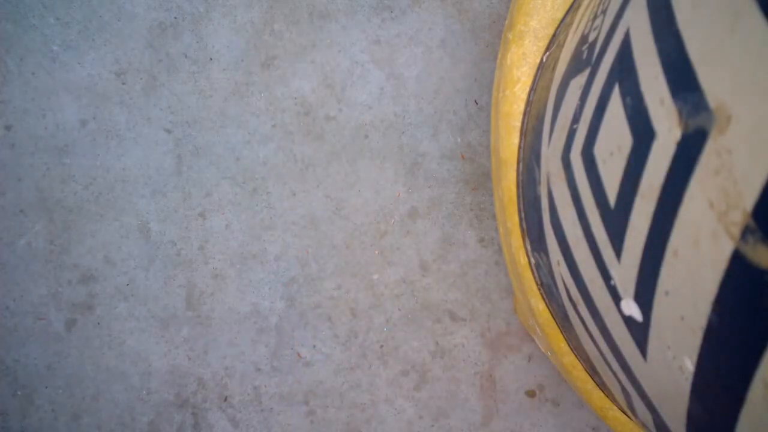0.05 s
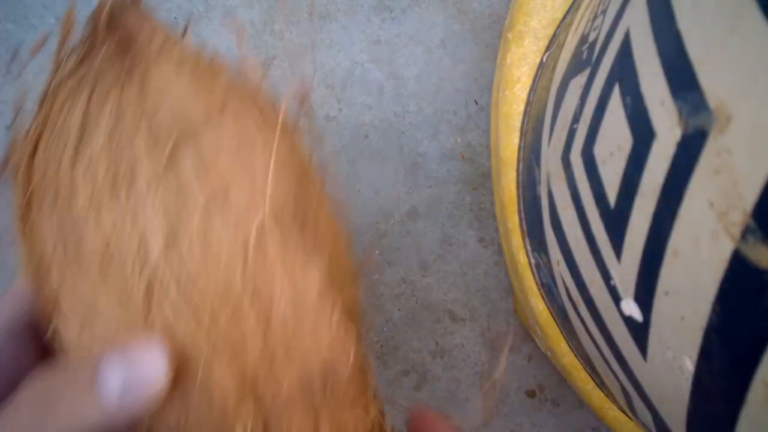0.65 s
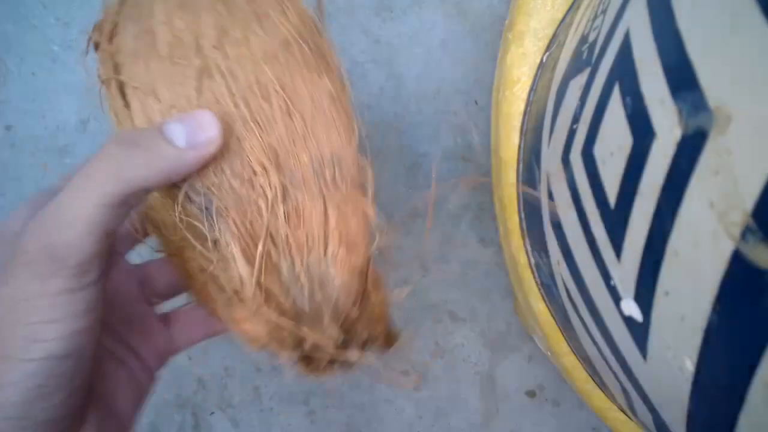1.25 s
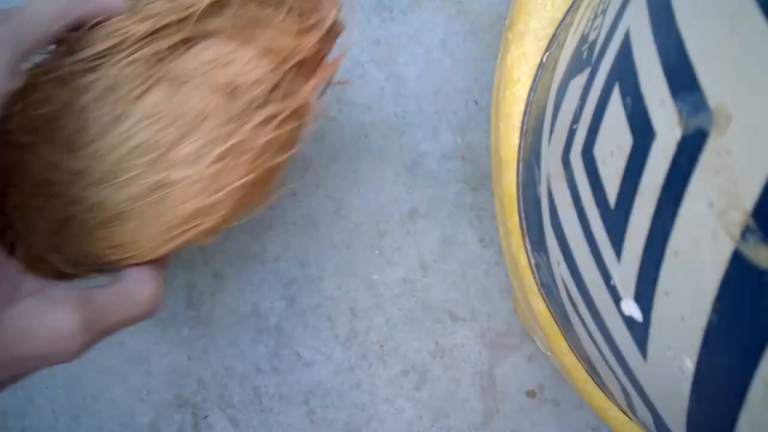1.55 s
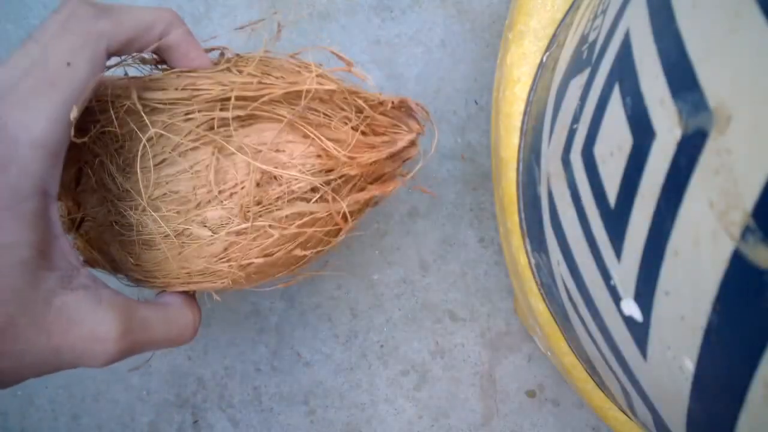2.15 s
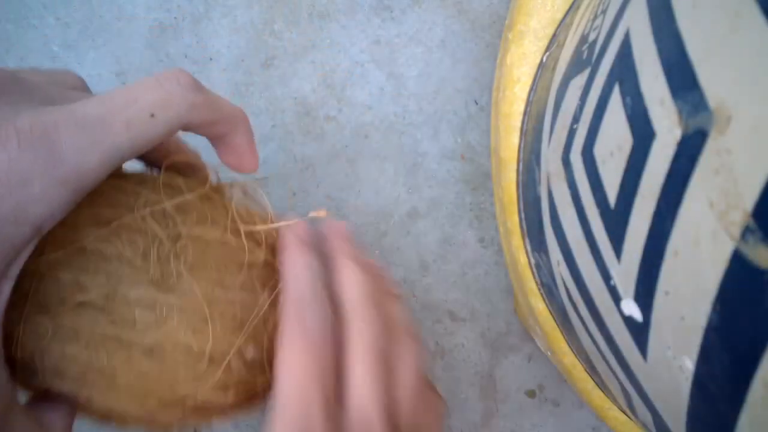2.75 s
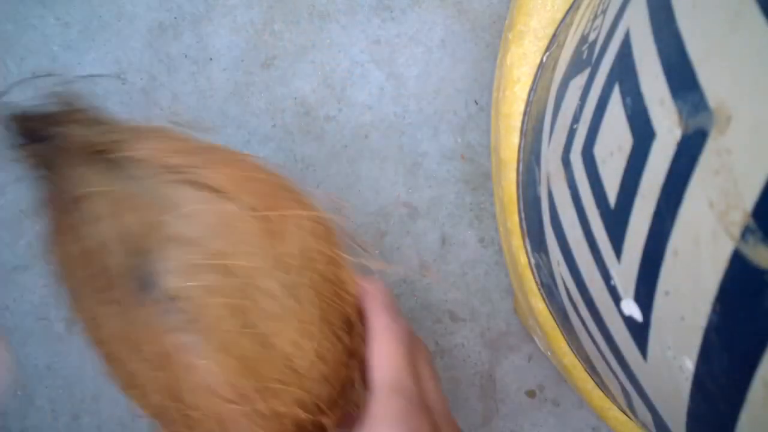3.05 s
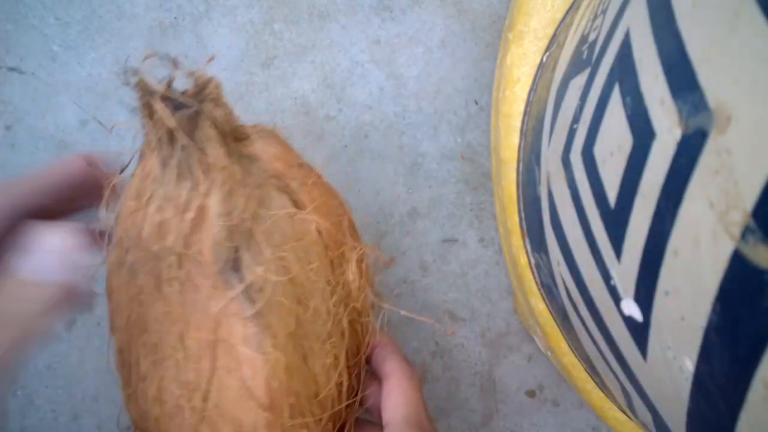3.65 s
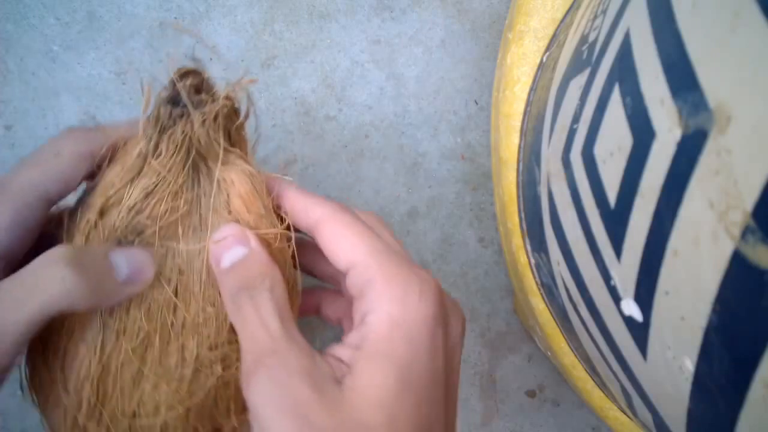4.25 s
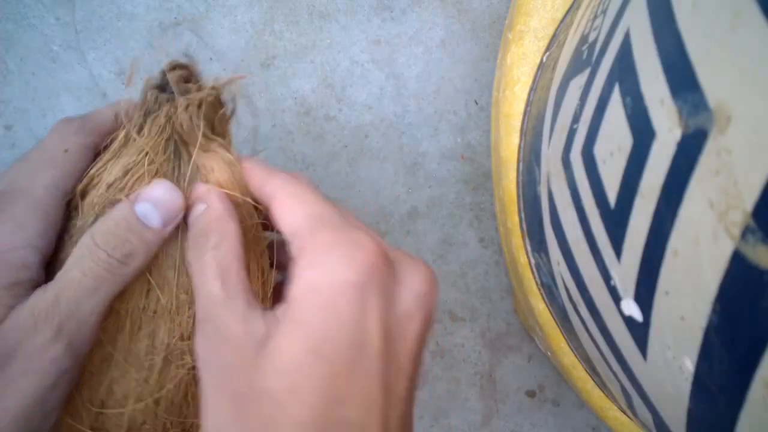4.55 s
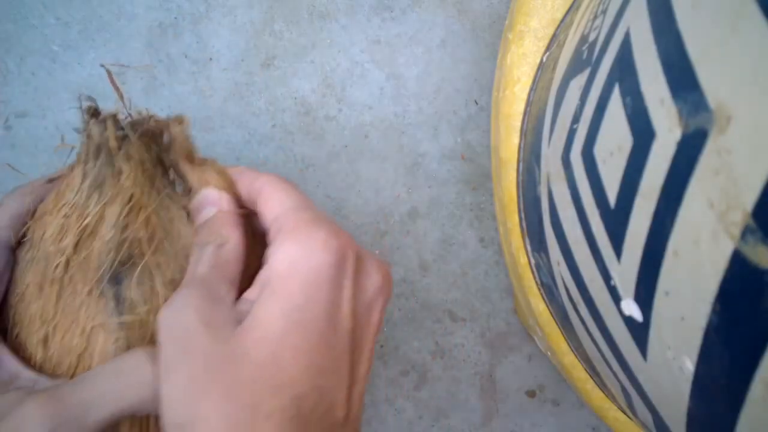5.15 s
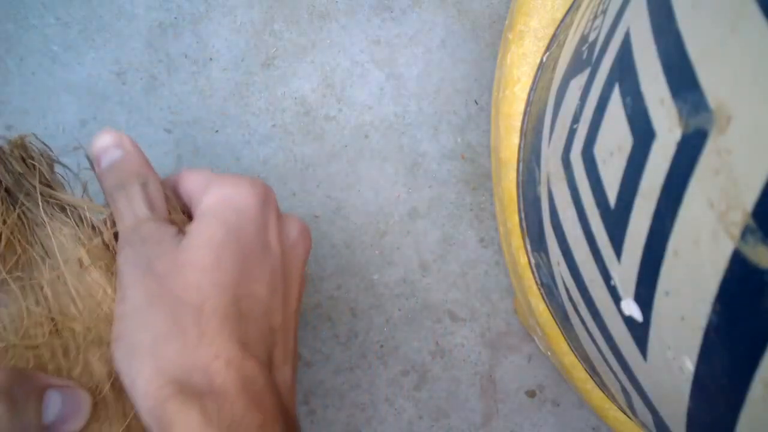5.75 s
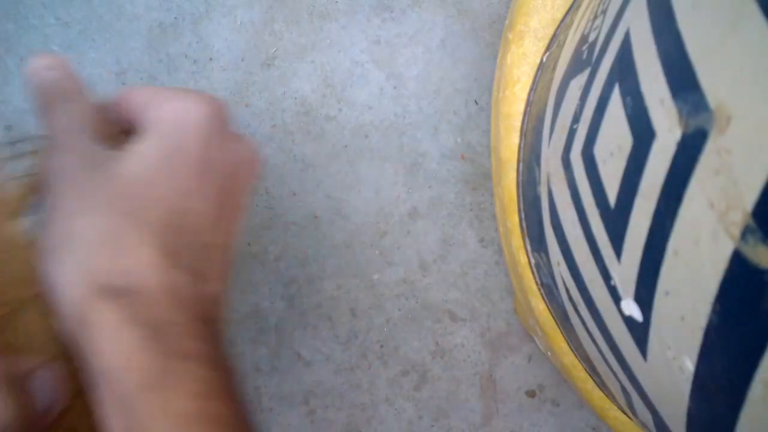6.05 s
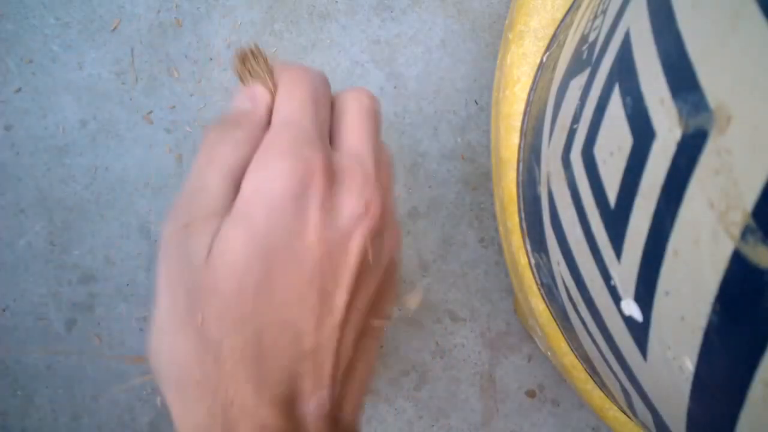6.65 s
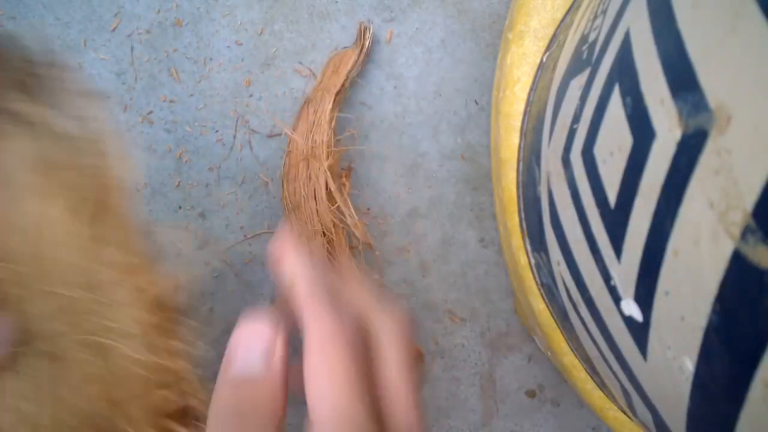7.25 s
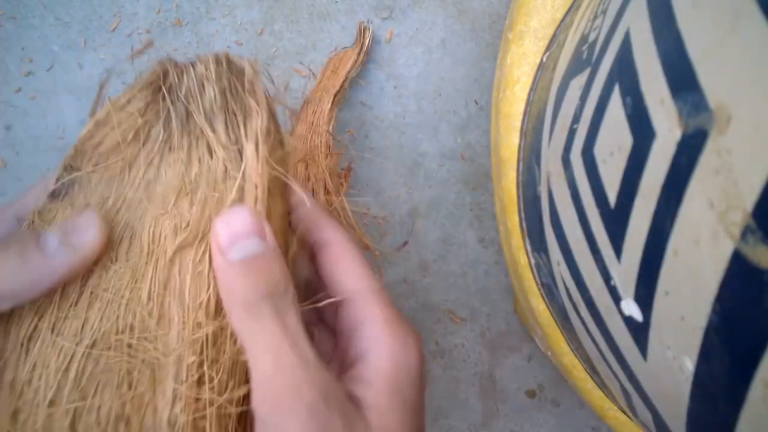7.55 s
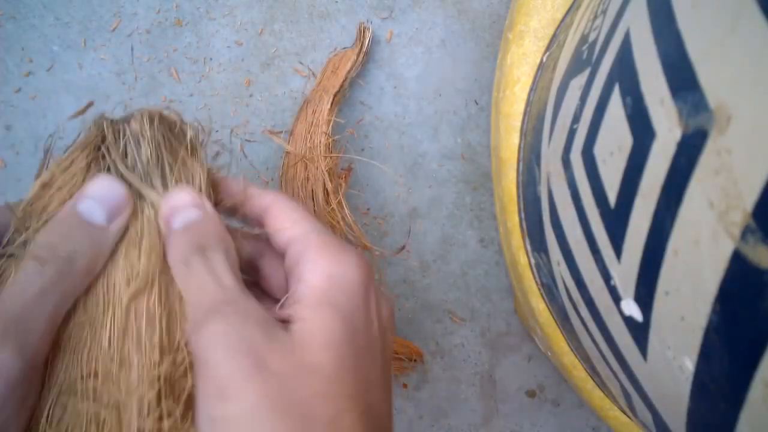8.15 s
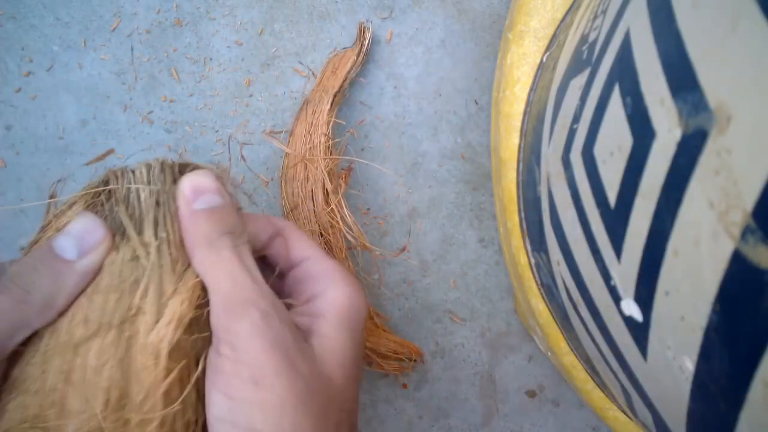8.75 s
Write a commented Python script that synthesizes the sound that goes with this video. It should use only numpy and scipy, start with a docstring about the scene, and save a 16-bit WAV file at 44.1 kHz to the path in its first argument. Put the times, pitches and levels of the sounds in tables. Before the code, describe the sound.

Hands rub and scratch a dry coconut husk, then rip a strip away in two loud crackling pulls, with faint birds far off.

```python
"""A dry coconut husk is rubbed, prised open and torn in two pulls over a stone floor.
Friction and fracture release thousands of stiff fibres, each a tiny crack with a damped ring.
The hollow nut resonates under the fingers, small hard things tick, arms rustle, the husk creaks
and the freed strip scrapes the floor. Hard walls reflect a short tail;
small birds whistle far away over a faint hush of air."""
import sys
import numpy as np
from scipy import signal
from scipy.fft import rfft, irfft
from scipy.io import wavfile
from scipy.ndimage import uniform_filter1d, map_coordinates

SR = 44100
rng = np.random.default_rng(int(sys.argv[2]) if len(sys.argv) > 2 else 0)


def unload_wav(signal):
    """Save mono or channel-first audio to the path in sys.argv[1] as 16-bit WAV at rate SR, clipped to [-1, 1]."""
    wavfile.write(
        sys.argv[1],
        SR,
        np.round(np.clip(np.atleast_2d(signal).T, -1, 1) * 32767).astype(np.int16),
    )


N = 388080
TIME, BIN_HZ = np.arange(N) / SR, np.fft.rfftfreq(N, 1 / SR)
CRACKLE_HZ, BODY_HZ, DEEP_HZ = (5000, 9000), (500, 1800), (120, 450)  # bands in which levels are set
SAG_DB_PER_S, RELEASE_DB_PER_S = 17, 178

# finger strokes: (start [s], length [s], relative scratch level [dB], body offset [dB])
STROKES = [(0.0, 0.0067, -57, -1.5), (0.1, 0.44, -62, -3.5), (0.44, 0.19, -70, 10.5),
           (0.675, 0.043, -65.5, 4.5), (1.305, 0.025, -57, -24), (1.7, 0.13, -59, -7),
           (1.893, 0.05, -52, -4), (1.968, 0.062, -54.5, -1.5), (2.55, 0.3, -67.5, -5),
           (2.675, 0.15, -58.5, -1), (2.885, 0.092, -61.5, 5.5), (2.94, 0.19, -52.5, -5.5),
           (3.855, 0.097, -51.5, -6), (4.115, 0.064, -50.5, -10), (4.2, 0.11, -60, -1.5),
           (4.355, 0.023, -55, 2), (4.43, 0.14, -53, 0), (4.61, 0.24, -53.5, -3), (4.82, 0.11, -48, -7.5),
           (4.92, 0.12, -52.5, -5.5), (5.125, 0.055, -60.5, 4), (5.56, 0.083, -45.5, -12),
           (5.715, 0.083, -44.5, -12), (5.8, 0.26, -57, -13), (6.02, 0.055, -45.5, -12),
           (6.76, 0.11, -53, -27), (6.97, 0.19, -52.5, -14), (7.39, .07, -56.5, -36),
           (7.455, 0.075, -50.5, -8), (7.6, 0.069, -48.5, -6), (7.7, 0.13, -50.5, -15),
           (7.77, 0.096, -48.5, -8.5), (7.905, 0.092, -50.5, -9), (8.162, 0.033, -51.5, -1.5),
           (8.35, 0.061, -49, -4.5), (8.41, 0.19, -55, -2.5), (8.672, 0.023, -51, -2),
           (8.76, 0.06, -47, -9)]
# the nut shifting in the hands: (start [s], length [s], relative scratch level [dB], body offset [dB])
HOLDS = [(0.0, 2.1, -74.5, 1.5), (2.1, 2.9, -81.5, 0.5), (3.86, 0.88, -62, -7), (5.0, 2, -62.5, -4),
         (6.6, 0.753, -59, -13.5), (7.4, 1.4, -62, -5.5)]
# arm movements: (start [s], length [s], relative level [dB])
SHUFFLES = [(0.0, .05, -62.5), (0.058, 0.05, -55), (0.13, 0.079, -54), (0.263, 0.54, -61),
            (6.566, 0.088, -63), (7.135, 0.14, -62.5)]
# fingers striking the nut, plus one slow-rising stick-slip squeak of a finger at 1.978 s: (time [s], level
# [dB], resonance [Hz], rise [s], T60 [s])
KNOCKS = [(0.069, -47, 710, 0.003, 0.06), (1.903, -46, 1003, 0.0033, 0.061),
          (1.978, -35.5, 1140, 0.018, 0.044), (1.998, -49, 1170, 0.0043, 0.29),
          (2.738, -51, 1160, 0.0027, .05), (4.616, -35.5, 1470, 0.00051, 0.02),
          (5.370, -39.5, 404, 0.0021, 0.022), (6.365, -16.5, 900, 0.0043, 0.022),
          (8.168, -49, 1292, 0.0099, .07), (8.362, -44, 900, .004, 0.036),
          (8.380, -32.5, 876, 0.0026, 0.04), (8.601, -38.5, 1005, 0.0032, 0.021)]
# small hard impacts: (time [s], relative level [dB], pitch [Hz], rise [s], T60 [s])
TICKS = [(0.069, -36.5, 5000, 0.0032, 0.025), (0.126, -47, 6380, 0.0092, 0.036),
         (0.172, -45.5, 6650, 0.004, 0.12), (1.316, -59.5, 5470, 0.0021, 0.51),
         (2.019, -56.5, 3164, 0.027, 0.17), (8.421, -48.5, 3080, 0.0097, 0.12)]
# modes of a tick: (frequency [multiple of pitch], gain [dB])
TICK_MODES = [(0.551, -12), (1.001, 3), (1.21, -4.5), (1.36, -9), (1.65, -28)]
# fibre bundles breaking: (time [s], peak level [dB], body gain against crackle [dB], T60 [s])
SNAPS = [(0.126, -58, -6, 0.04), (0.171, -59, -14, .08), (3.886, -58, -6, .025), (4.236, -45, 12, 0.031),
         (4.6178, -43.5, 16, 0.019), (4.656, -55, 12, .02), (5.2511, -43, -4, 0.026),
         (5.314, -36, 11, 0.075), (5.336, -35, 25, 0.028), (5.370, -26.5, 7, 0.043),
         (5.3803, -24, 4.5, 0.031), (5.429, -32, 17, 0.049), (5.479, -22.5, -5, 0.026),
         (5.4995, -29, 8, 0.024), (5.5142, -30, 3, 0.009), (5.598, -34.5, -13, 0.0078),
         (5.634, -32.5, -6, 0.0074), (5.7278, -39, 11, 0.0092), (5.7446, -41, 12, 0.0081),
         (5.7563, -32.5, 11, 0.0071), (5.8314, -36.5, -5, 0.068), (5.8512, -32.5, 1.5, .03),
         (6.0194, -39.5, -3, .013), (6.0565, -32, -13, 0.043), (6.0743, -19.5, 1.5, .012),
         (6.1803, -27.5, -1, .012), (6.2232, -22, 0, 0.01), (6.3054, -23, -27, 0.0096),
         (6.3175, -17, -27, 0.024), (6.358, -18.5, -9, 0.015), (6.3658, -13.5, 0, .023),
         (6.3777, -21, 3, 0.037), (6.6118, -49, -12.5, 0.089), (7.247, -50, 12, 0.029),
         (7.6042, -44.5, 2, 0.032), (8.05, -45, -2, 0.04), (8.361, -41.5, 17, 0.038),
         (8.379, -36, 13, 0.026), (8.495, -47.5, 16, .02), (8.5527, -49, 3, 0.022), (8.693, -39, 14, 0.022)]
# distant calls: (start [s], length [s], first pitch [Hz], last pitch [Hz], relative level [dB])
BIRD_CALLS = [(0.223, 0.092, 4760, 4040, -49.5), (0.447, 0.12, 1388, 1340, -59),
              (0.466, 0.12, 1830, 1845, -63), (1.049, .15, 3540, 4670, -71),
              (1.122, .062, 5060, 5400, -57.5), (1.19, 0.11, 5500, 5850, -72),
              (1.724, 0.11, 4870, 4180, -49), (2.846, 0.074, 2430, 2730, -53.5),
              (3.155, 0.076, 2213, 1780, -54), (3.306, 0.06, 2014, 1884, -59.5),
              (3.89, 0.093, 4680, 4230, -49), (5.849, 0.1, 6040, 5610, -43)]
# the husk being prised open: (time [s], resonance [Hz], level [dB])
CREAK = [(4.92, 567, -72), (5.0, 570, -49.5), (5.03, 554, -63), (5.088, 512, -59.5), (5.144, 505, -63),
         (5.2, 537, -80)]
# speed of the tear, one curve per pull: (time [s], relative level [dB])
PULLS = [
    [(5.27, -56), (5.315, -41.5), (5.36, -43.5), (5.39, -33.5), (5.501, -27), (5.579, -48.5)],
    [(6.05, -45), (6.09, -40), (6.13, -27), (6.166, -36.5), (6.245, -27), (6.305, -31), (6.371, -20.5),
     (6.441, -24.5), (6.465, -41), (6.539, -48)],
]
# resonances of the strip on the floor: (frequency [Hz], bandwidth [Hz], gain [dB])
SCRAPE_MODES = [(2240, 90, 5), (4180, 220, 2.5), (5530, 520, 2), (7650, 3100, -2)]
# source spectra: (frequency [Hz], relative spectral density [dB])
RUB_SPECTRUM = [(150, -43.5), (320, -15), (530, 2.5), (800, -3.5), (1200, 2.5), (1800, -1), (2650, -3),
                (3400, -6), (4800, -6), (6400, -1), (7900, -11), (9000, -23.5), (10800, -35),
                (15000, -39.5)]
SHUFFLE_SPECTRUM = [(59, -43), (100, -20), (246, -5.5), (319, -10), (528, -15.5), (661, -5), (1300, -17),
                    (1690, -29), (2860, -120)]
AIR_SPECTRUM = [(25, -29), (80, -10.5), (140, -5), (252, -6), (388, -9.5), (530, -8.5), (760, -10.5),
                (1080, -15.5), (1400, -17.5), (4200, -22), (5200, -18), (8300, -39.5), (11000, -35.5),
                (15400, -39)]
SNAP_SPECTRUM = [(60, -54), (200, -36), (450, -19.5), (850, -10.5), (1300, -8), (3000, -6), (4600, -4.5),
                 (5900, 2.5), (7400, -3.5), (8800, -16.5), (10800, -26.5), (15000, -49)]
RIP_SPECTRUM = [(47, -54), (80, -36), (260, -20.5), (400, -19.5), (540, -19), (830, -9), (1000, -10),
                (1250, -14), (3090, -1.5), (4690, -1.5), (5720, 5), (7290, -1.5), (10600, -23),
                (15400, -27)]
# reverberation of the walls: (frequency [Hz], T60 before stretching [s])
BASE_T60 = [(200, 0.47), (530, 0.36), (1400, 0.39), (3700, 0.16), (10000, 0.3)]


def amp(db):
    """Amplitude grows tenfold per 20 dB."""
    return 10 ** (np.asarray(db) / 20)


def unit(x):
    """Normalisation to rms 1."""
    return x / np.sqrt(np.mean(x ** 2) + 1e-20)


def at_frequency(points, hz):
    """Interpolation on a log-frequency axis."""
    f, value = np.transpose(points)
    return np.interp(np.log(hz + 1), np.log(f + 1), value)


def envelope(rows, column):
    """Interpolation in decibels gives a gain over time, silent outside the rows."""
    rows = np.array(rows)
    return amp(np.interp(TIME, rows[:, 0], rows[:, column], left=-200, right=-200))


def add(mix, start, sound):
    """Superposition of a sound from a start time in seconds."""
    part = mix[max(round(start * SR), 0):][:len(sound)]
    part += sound[:len(part)]


def colour(x, spectrum):
    """Minimum-phase filtering imposes a spectrum and keeps attacks sharp."""
    db = np.maximum(at_frequency(spectrum, abs(np.fft.fftfreq(4096, 1 / SR))), -100)
    response = np.exp(np.conj(signal.hilbert(np.log(amp(db)))))
    return signal.oaconvolve(x, np.fft.ifft(response).real[:2048])[:len(x)]


def split(x, hz):
    """A crossover: the lower and upper parts sum to a flat response."""
    return [signal.sosfilt(signal.butter(3, hz, side, fs=SR, output="sos"), x)
            for side in ("low", "high")]


def band_rms(x, band):
    """Parseval's theorem gives the rms inside a band."""
    inside = (BIN_HZ > band[0]) & (BIN_HZ < band[1])
    return np.sqrt(2 * np.sum(abs(rfft(x)[inside]) ** 2)) / N


def wander(size, hz):
    """Low-passed noise: random motion of rms 1."""
    rolloff = 1 + (np.fft.rfftfreq(size, 1 / SR) / hz) ** 4
    return unit(irfft(rfft(rng.standard_normal(size)) / rolloff, size))


def fibres(per_s, spread_db, clump_db, clump_hz, cycles, crack=1.0):
    """A Poisson process: fibres let go, louder in clumps, each with a crack and a damped ring."""
    at = np.flatnonzero(rng.random(N) < per_s / SR)
    spread = spread_db * np.minimum(rng.exponential(1, N)[at], 3)
    clumps = 2 * clump_db * np.tanh(wander(N, clump_hz)[at] / 2)
    size = amp(spread + clumps)
    hz = rng.uniform(400, 10000, N)[at, None]
    sign = rng.choice([-1, 1], N)[at]
    step = np.arange(160)
    t = step / SR
    decay = np.sqrt(hz * 5000) / cycles  # a 5 kHz fibre falls to 1/e in this many cycles
    ring = np.sin(2 * np.pi * hz * t) * np.exp(-t * decay) * np.sqrt(decay)
    rings = np.bincount((at[:, None] + step).ravel(), (ring * (sign * size)[:, None]).ravel(), N)[:N]
    crack_power = signal.lfilter([1], [1, -np.exp(-1 / (0.00034 * SR))], np.bincount(at, size ** 2, N))
    out = unit(rings) + crack * unit(np.sqrt(crack_power) * rng.standard_normal(N))
    # the hand supplies energy steadily, so clumps even out over longer stretches
    return out / np.sqrt(uniform_filter1d(out ** 2, size=2600) + 1e-12)


def gesture(start, length, db, sag):
    """Envelope of a movement: linear attack, then exponential slackening and release."""
    gain = np.zeros(N)
    t = np.arange(int((length + .4) * SR)) / SR
    attack_s = min(0.03, 0.3 * length)  # short flicks gather speed sooner
    level_db = db - sag * t - RELEASE_DB_PER_S * np.maximum(t - length, 0)
    add(gain, start, np.minimum(t / attack_s, 1) * amp(level_db))
    return gain


def handling():
    """Incoherent strokes and holds add in power, giving the gains of scratch and husk body."""
    scratch, body = np.zeros((2, N))
    for rows, sag in ((STROKES, SAG_DB_PER_S), (HOLDS, 0)):
        for start, length, db, body_db in rows:
            power = gesture(start, length, db, sag) ** 2
            scratch += power
            body += power * amp(body_db) ** 2
    stick_slip = amp(2.66 * wander(N, hz=5.6))
    return np.sqrt([scratch, body]) * stick_slip


def rubbing(speed, pressure, floor_s=(6.62, 7.39)):
    """Sliding friction: skin drags over loose fibres; a firmer grip brings out the husk beneath."""
    grains = fibres(per_s=2600, spread_db=0.5, clump_db=-0.5, clump_hz=55.6, cycles=26)
    grains = colour(grains, RUB_SPECTRUM)
    body, scratch = split(grains, hz=2680)
    scrape = scraping(scratch)
    on_floor = uniform_filter1d(1.0 * ((TIME > floor_s[0]) & (TIME < floor_s[1])), size=1000)
    surface = (1 - on_floor) * scratch / band_rms(grains, CRACKLE_HZ)
    surface += on_floor * scrape / band_rms(scrape, CRACKLE_HZ)
    return amp(-2.16) * speed * surface + amp(-4.08) * pressure * body / band_rms(grains, BODY_HZ)


def stray_fibres(speed):
    """Elastic release: single stiff fibres flick free of the fingers with crisp ticks."""
    ticks = colour(fibres(per_s=70, spread_db=3, clump_db=1.5, clump_hz=25, cycles=4.1), SNAP_SPECTRUM)
    return amp(-14.5) * speed * ticks / band_rms(ticks, CRACKLE_HZ)


def shuffling():
    """Amplitude-modulated noise: moving arms make a dull, fluttering rustle."""
    motion = sum(gesture(*row, SAG_DB_PER_S) for row in SHUFFLES)
    rustle = colour(rng.standard_normal(N), SHUFFLE_SPECTRUM)
    flutter = amp(2.6 * wander(N, hz=40))
    return amp(-2.5) * motion * unit(rustle * flutter)


def air():
    """Broadband ambient noise: a faint hush whose level drifts slightly."""
    hush = unit(colour(rng.standard_normal(N), AIR_SPECTRUM))
    return amp(-69) * hush * amp(0.39 * wander(N, hz=1))


def blows(rows, pitch_jitter, grit, jitter_hz):
    """Damped oscillation: each blow swells, then decays on one gritty resonance."""
    t, out = np.arange(SR // 5) / SR, np.zeros(N)
    for start, db, hz, rise, t60 in rows:
        shape = np.minimum(t / rise, 1) ** 2 * amp(-60 * np.maximum(t - rise, 0) / t60)
        pitch = hz * (1 + pitch_jitter * wander(len(t), jitter_hz))
        ring = np.sin(2 * np.pi * np.cumsum(pitch) / SR)
        add(out, start, amp(db) * shape * ring * (1 + grit * wander(len(t), hz=540)))
    return out


def knocking():
    """Impact excitation: fingers ring the hollow nut at a pitch set by the grip; once a slipping finger makes
    it squeak."""
    return blows(KNOCKS, pitch_jitter=0.058, grit=0.22, jitter_hz=330)


def ticking():
    """Modal superposition: small hard things ring with inharmonic partials as the nut is turned."""
    partials = [(start, db + mode_db, hz * ratio, rise, t60)
                for start, db, hz, rise, t60 in TICKS for ratio, mode_db in TICK_MODES]
    return blows(partials, pitch_jitter=0.045, grit=0.3, jitter_hz=900)


def snapping(ragged_db=9.0, rise_s=0.0012):
    """Brittle fracture: a bundle breaks in an avalanche of cracks that builds up, then dies."""
    t, out = np.arange(SR // 10) / SR, np.zeros(N)
    attack = np.sqrt(np.minimum(t / rise_s, 1))
    for start, db, body_db, t60 in SNAPS:
        cracks, sizes = rng.standard_normal((2, len(t)))
        decay_db = 60 * np.maximum(t - rise_s, 0) / t60
        burst = attack * cracks * amp(ragged_db * np.clip(sizes, -2, 2) - decay_db)
        body, crackle = split(colour(burst, SNAP_SPECTRUM), hz=2500)
        snap = crackle + amp(body_db) * body
        peak_rms = np.sqrt(uniform_filter1d(snap ** 2, size=88).max())
        add(out, start, amp(db) * snap / peak_rms)
    return out


def birds(waver_hz=150, hoarse_below_hz=2200):
    """Random frequency modulation roughens gliding whistles; low calls are the hoarsest."""
    out = np.zeros(N)
    for start, length, first_hz, last_hz, db in BIRD_CALLS:
        size = int(length * SR)
        waver = waver_hz * min(hoarse_below_hz / first_hz, 1) * wander(SR, hz=248)[:size]
        hz = np.linspace(first_hz, last_hz, size) + waver
        whistle = np.sin(2 * np.pi * np.cumsum(hz) / SR)
        add(out, start, amp(db) * unit(whistle * signal.windows.tukey(size, .6)))
    return out


def creaking():
    """Stick-slip friction under the thumb excites one low resonance of the husk."""
    times, pitches, _ = np.transpose(CREAK)
    hz = np.interp(TIME, times, pitches) * (1 + 0.0638 * wander(N, hz=109.6))
    ring = np.sin(2 * np.pi * np.cumsum(hz) / SR)
    return envelope(CREAK, column=2) * unit(ring * (1 + .5 * wander(N, hz=45)))


def ripping():
    """Crack propagation: the tear runs in jerks, thick fibres crack, the growing strip sounds deeper."""
    speed = sum(envelope(pull, column=1) for pull in PULLS)
    freed = np.cumsum(speed) / speed.sum()
    rasp = fibres(per_s=4500, spread_db=2, clump_db=1.7, clump_hz=140, cycles=4.5)
    rasp = colour(rasp, RIP_SPECTRUM)
    thick = fibres(per_s=250, spread_db=2, clump_db=2.5, clump_hz=58.4, cycles=13, crack=1.5)
    thick = colour(thick, SNAP_SPECTRUM)
    lower, crackle = split(rasp, hz=2650)
    deep, body = split(split(lower, hz=200)[1], hz=500)
    return speed * (amp(-2) * crackle / band_rms(rasp, CRACKLE_HZ)
                    + amp(-9) * thick / band_rms(thick, CRACKLE_HZ)
                    + amp(-16.5 + 3 * freed) * body / band_rms(rasp, BODY_HZ)
                    + amp(-44 + 27.5 * freed) * deep / band_rms(rasp, DEEP_HZ))


def scraping(scratch):
    """Resonant filtering: flat on the floor, the torn strip colours its own scratch."""
    return scratch + sum(amp(db) * signal.lfilter(*signal.iirpeak(hz, hz / width, fs=SR), scratch)
                         for hz, width, db in SCRAPE_MODES)


def hand_reflection(x, delay_s, echo_db):
    """Comb filtering: an echo off the moving hands and nut interferes at shifting frequencies."""
    delay = delay_s * (1 + .8 * np.tanh(wander(N, hz=3)))
    echo = map_coordinates(x, [(TIME - delay) * SR], order=3)
    return (x + amp(echo_db) * echo) / np.hypot(1, amp(echo_db))


def walls(x, stretch, echoes_per_s=3000):
    """Reverberation: sparse reflections of random sign, each band decaying at its own rate."""
    taps = rng.choice([-1., 1.], SR) * (rng.random(SR) < echoes_per_s / SR) * (TIME[:SR] > .004)
    hz, t, bands = signal.stft(taps, SR, nperseg=256)
    t60 = stretch * at_frequency(BASE_T60, hz)[:, None]
    tail = signal.istft(bands * amp(-60 * t / t60), SR, nperseg=256)[1]
    return signal.fftconvolve(x, tail / np.linalg.norm(tail))[:N]


def scene():
    """Direct and reverberant sound superpose in mono; the far birds have the larger reverberant share."""
    speed, pressure = handling()
    near = hand_reflection(rubbing(speed, pressure) + stray_fibres(speed), delay_s=0.000694, echo_db=-15)
    near += hand_reflection(ripping() + snapping(), delay_s=.0012, echo_db=-7.5)
    near += creaking() + shuffling() + knocking() + ticking()
    far = birds()
    mix = air() + near + amp(-8.5) * walls(near, stretch=0.94)
    mix += amp(-9) * far + amp(-9.5) * walls(far, stretch=2.7)
    return mix[None]


def record(dry):
    """Band limiting: a small microphone loses the lowest bass, and a low-pass cuts the top treble."""
    thinned = signal.sosfilt(signal.butter(1, 25, "high", fs=SR, output="sos"), dry)
    low_pass = signal.firwin(511, 15600, window=("kaiser", 9), fs=SR)
    return signal.oaconvolve(thinned, low_pass[None], "same")


dry = scene()
out = record(dry)
unload_wav(out)
```